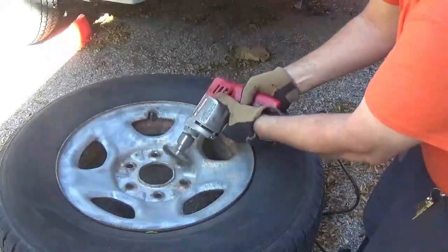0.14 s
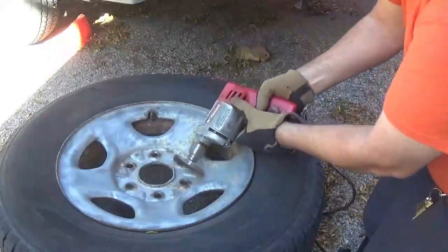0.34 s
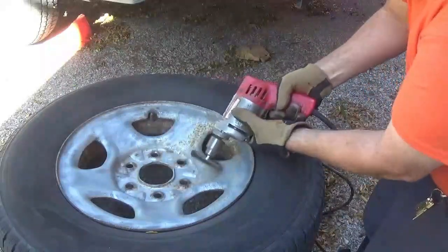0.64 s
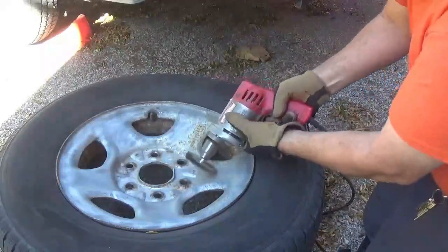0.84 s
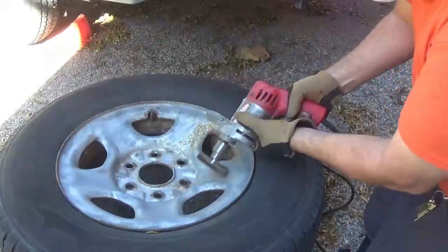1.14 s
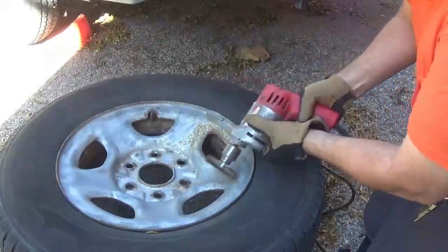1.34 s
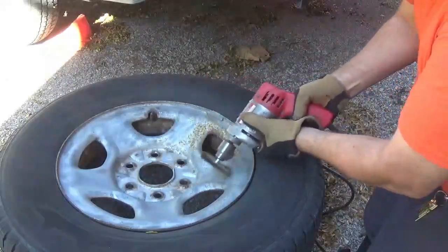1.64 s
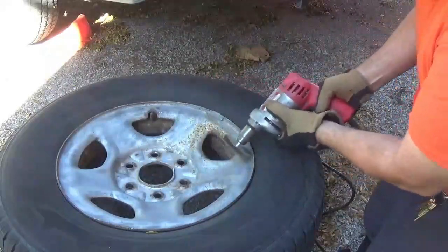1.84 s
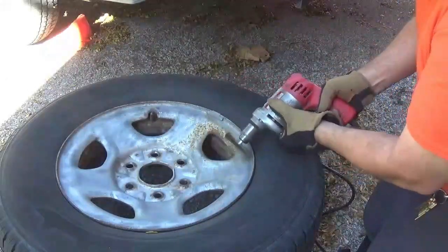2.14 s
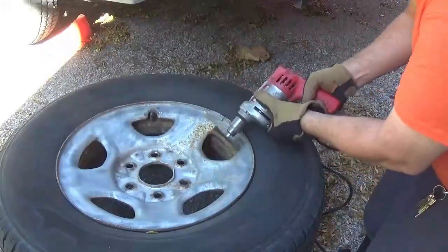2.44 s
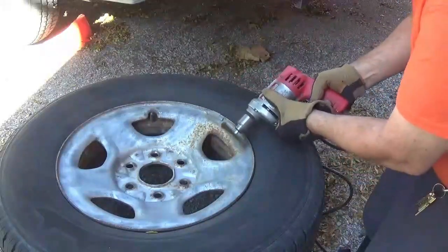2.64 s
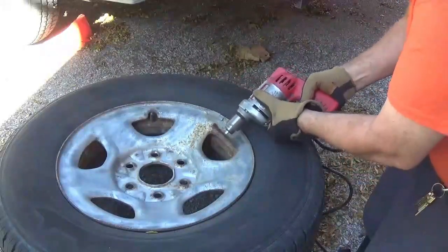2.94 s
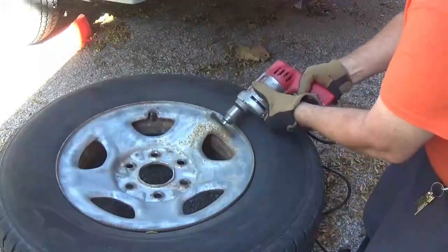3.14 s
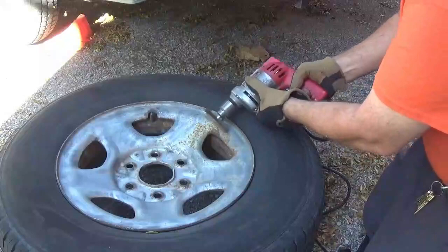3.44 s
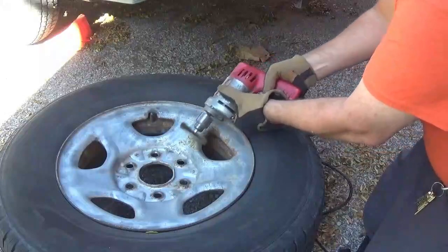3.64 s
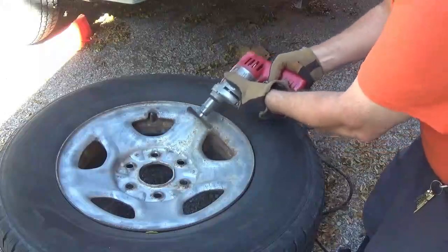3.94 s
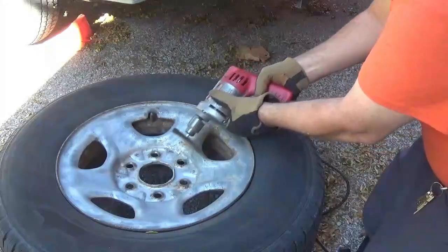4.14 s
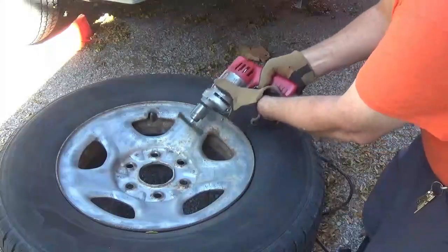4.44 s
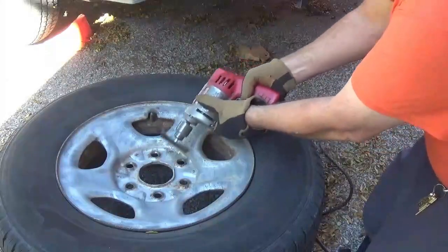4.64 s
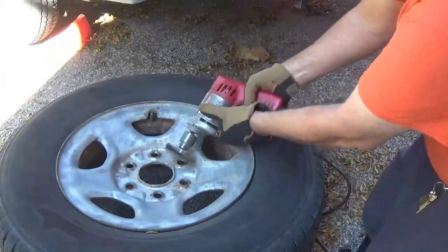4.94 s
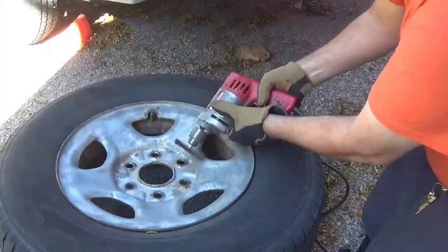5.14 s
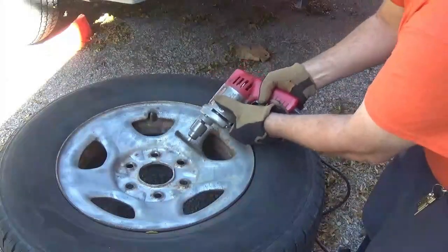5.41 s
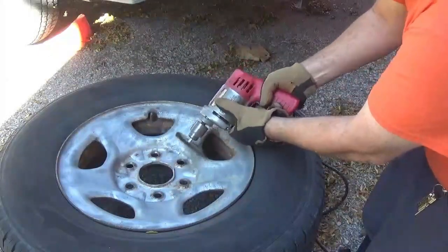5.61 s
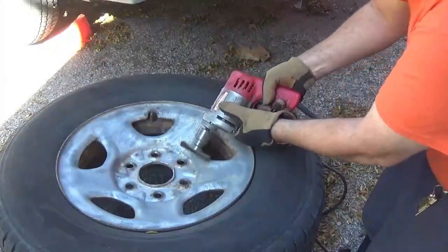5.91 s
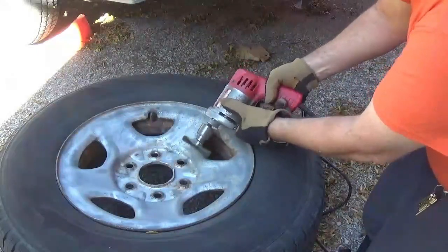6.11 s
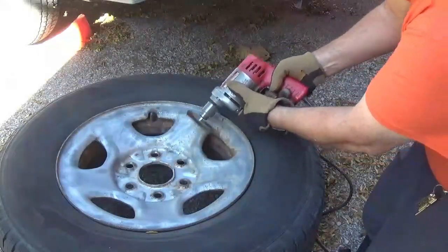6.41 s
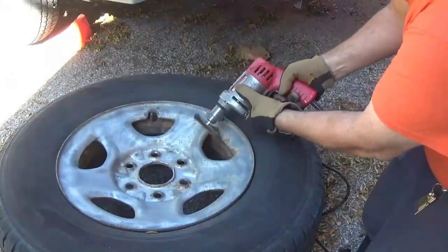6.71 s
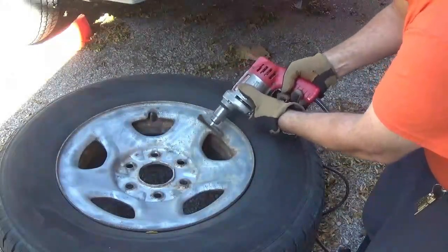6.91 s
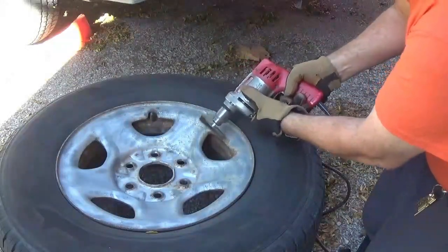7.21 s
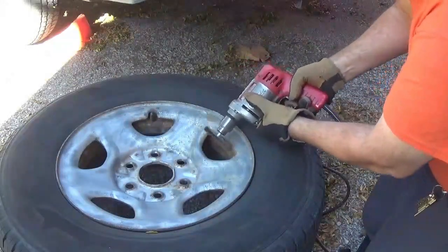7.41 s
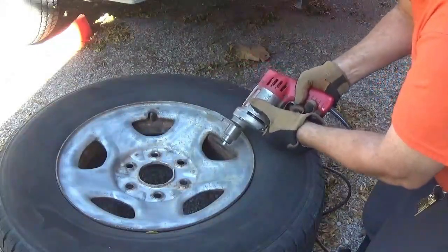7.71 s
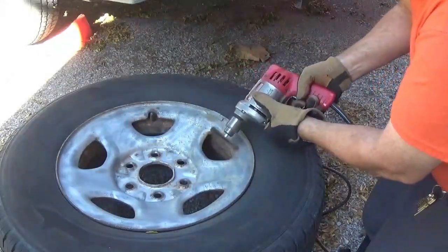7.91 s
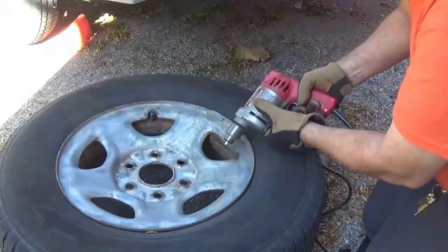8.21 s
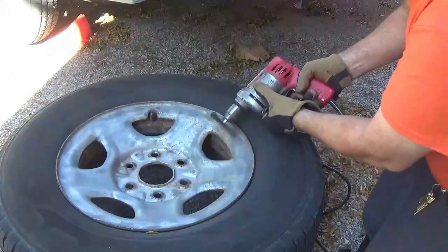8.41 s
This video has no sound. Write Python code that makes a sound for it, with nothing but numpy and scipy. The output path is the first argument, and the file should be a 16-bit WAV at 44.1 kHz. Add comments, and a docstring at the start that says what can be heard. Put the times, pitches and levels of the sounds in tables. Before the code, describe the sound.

The drill is already running at 0 seconds, close and in narrow stereo outdoors, and never stops. A high whine near 3.9 kHz starts fairly weak, strengthens by 0.7 and rises to about 4.1 kHz around 1.4. Wire tips make a dense scratchy hiss with a bright sizzle, surging with pushes near 0.4, 1.6 and 2.7. From about 3.6 to 4.6 the brush bears hard on the wheel face: scraping thickens, metal rings in short catches, and the whine sags to roughly 3.9 kHz. Gear hiss brightens around 5. The pitch then climbs to about 4.2 kHz by 6.3, strong and piercing, while another sliding push swishes at 6.6. It slowly sinks toward 4 kHz as edge scraping and a swell of wheel ringing continue to the cut at about 8.5. Vent air is steady; soft low wind swells late.

```python
"""Wire scratches and a gear head hisses under a whine: a corded drill spins a wire brush over a steel
truck wheel lying on a driveway, heard by a close pair of microphones.
Strikes of the wire tips are coloured noise and set the wheel's modes ringing; the gears are throbbing noise.
The cooling fan's whine is a tone that sags in pitch under load, with weaker tones from the motor shaft.
Vent air, a little wind and a low hum lie underneath."""
import sys
import numpy as np
from scipy import signal
from scipy.fft import rfft, irfft, next_fast_len
from scipy.io import wavfile
from scipy.ndimage import map_coordinates

SR = 44100
rng = np.random.default_rng(int(sys.argv[2]) if len(sys.argv) > 2 else 0)


def persist_wave(psi):
    """Save psi, clipped to +-1, as 16-bit WAV."""
    counts = np.round(np.clip(psi, -1, 1) * 32767).astype(np.int16)
    wavfile.write(sys.argv[1], SR, np.atleast_2d(counts).T)


N = 377496

BLADES = 12  # on the cooling fan

# The fan's blade tone, which gives the motor speed. Each row: time in seconds, pitch in Hz.
FAN_PITCH = [(0.0, 3900), (0.14, 3834), (0.32, 3887), (0.46, 3856), (0.68, 4011), (1.04, 4118),
             (1.44, 4134), (1.6, 4078), (1.86, 4080), (1.94, 4030), (2.26, 4084), (3.22, 4035),
             (3.64, 4036), (3.84, 3935), (4.16, 3923), (4.26, 3870), (4.77, 3995), (4.84, 3927),
             (4.99, 3937), (5.16, 3895), (5.26, 3920), (5.46, 4110), (5.84, 4211), (6.32, 4238),
             (6.52, 4193), (6.8, 4225), (7.08, 4158), (7.66, 4105), (7.88, 4063), (8.14, 4047),
             (8.42, 4005), (8.56, 4044)]


def gain_of(db):
    """Decibels to amplitude."""
    return 10 ** (np.asarray(db) / 20)


def evened(x):
    """Scales to rms 1."""
    return x / np.sqrt(np.mean(abs(x) ** 2) + 1e-20)


def curves(rows):
    """Each column of a timed table, sample by sample."""
    s, *columns = np.transpose(rows)
    return [np.interp(np.arange(N) / SR, s, column) for column in columns]


def swells(rows):
    """Each column of an event table as smooth humps that rise and fall."""
    t = np.arange(N) / SR
    total = 0
    for middle, length, *heights in rows:
        phase = np.pi * np.clip((t - middle) / length, -.5, .5)
        total = total + np.outer(heights, np.cos(phase) ** 2)
    return total


def read(points, hz):
    """A table against frequency, read on a log-frequency axis."""
    f, value = np.transpose(points)
    return np.interp(np.log(hz + 1), np.log(f + 1), value)


def wander(rate_hz):
    """Slow chance of rms 1, mostly below the given rate."""
    points = 8192
    hz = np.fft.rfftfreq(points, N / points / SR)
    spectrum = rfft(rng.standard_normal(points)) / np.sqrt(1 + (hz / rate_hz) ** 4)
    return evened(np.interp(np.arange(N) * points / N, np.arange(points), irfft(spectrum)))


def noise():
    """Two unrelated white noises."""
    return rng.standard_normal((2, N))


def strikes(per_s, spread_db):
    """Dense tiny impacts of uneven size, at chance moments on each side."""
    size = gain_of(spread_db * np.minimum(rng.exponential(1, N), 4))
    return evened(noise() * size * (rng.random(N) < per_s / SR))


def ports(pair, colour):
    """Colours two unrelated signals and blends them into a close pair of microphones."""
    # Each row: frequency in Hz, likeness of left and right (0 to 1).
    likeness = [(60, 0.89), (250, 0.89), (600, 0.91), (1200, .91), (2400, .9), (5000, 0.96), (9000, 0.9)]
    size = next_fast_len(N, True)
    hz = np.fft.rfftfreq(size, 1 / SR)
    same = np.clip(read(likeness, hz), 0, .999)
    mid, side = rfft(pair, size) * colour(hz) * np.sqrt([1 + same, 1 - same])
    return evened(irfft([mid + side, mid - side], size)[:, :N])


def shaped(pair, spectrum):
    """A stereo sound of rms 1 with the given spectrum."""
    return ports(pair, lambda hz: gain_of(read(spectrum, hz)))


def warped(pair, at):
    """A stereo sound read at the given sample positions."""
    return np.array([map_coordinates(side, [at], order=3, mode="mirror") for side in pair])


def tone(turns, waver=0.38, smear=0.25):
    """A line of rms 1 that wavers a little in level and phase."""
    level = 1 + waver * wander(9.6)
    return evened(level * np.cos(2 * np.pi * (turns + rng.random()) + smear * wander(7.4)))


def face_share():
    """Where the brush bears: 0 at the edge of a window, 1 on the face of the disc."""
    # Each row: time in seconds, share on the face.
    place = [(0, .95), (.45, 0.56), (.8, 0.42), (2.2, 0.41), (2.6, .05), (3.5, 0.15), (3.72, 1),
             (4.35, 0.96), (4.6, 0.92), (5.5, 0.74), (6.4, .55), (7, .2), (8.56, 0.095)]
    return np.clip(curves(place)[0], 0, 1)


def worked(law):
    """A level in dB that follows the load, which slows the motor, and the place of contact."""
    free_hz, loaded_hz = 4240, 3840  # blade tone running free and at full load
    free_db, load_db, face_db = law
    load = (free_hz - curves(FAN_PITCH)[0]) / (free_hz - loaded_hz)
    return free_db + load_db * load + face_db * face_share()


def brush(turns, gearing=17.0, wobble=0.015):
    """Wire tips strike, ring and slide; the slightly lopsided brush bears harder once a turn."""
    # Pushes, in which the wires dig in and slide.
    # Each row: middle in seconds, length in seconds, dig in dB, slide in dB.
    pushes = [(0, 0.59, 1, 4.5), (.42, 0.53, -0.5, 5.5), (.85, .4, -1, 0), (1.62, 1.0, 0, 6.5),
              (2.12, .45, 0, 5.5), (2.7, .6, 1, 4.5), (3.7, 1.0, 3.5, 4), (4.13, 0.49, 5.5, 5),
              (4.62, .4, 3, 5.5), (5.48, .45, 3, 3), (5.97, 0.2, 2.5, 1), (6.6, 0.54, 3.5, 7),
              (7.1, 0.38, 0.5, 4), (8.05, 0.21, 2, 3), (8.38, 0.19, 2, 3)]
    # How hard the hands lean between pushes. Each row: time in seconds, level in dB before the scrape trim.
    lean = [(0, -33), (.45, -35.5), (.7, -29), (3.1, -30.5), (5.1, -31.5), (7.1, -28), (8.56, -30.5)]
    # Rise and fall of the tips' sizzle; only the departure from its mean counts.
    # Each row: time in seconds, relative level in dB.
    sizzle_level = [(0.0, -24.5), (0.44, -23.5), (0.68, -27.5), (0.84, -25), (1.04, -27), (2.18, -24.5),
                    (2.84, -24.5), (3.96, -29.4), (4.06, -27.5), (4.62, -28.5), (5.08, -25), (5.28, -28.9),
                    (5.98, -28.5), (6.3, -29.5), (8.4, -24.5), (8.56, -26)]
    # Each holds: dB running free at an edge, dB added at full load, dB added on the face.
    rasp_law, swish_law = (-36, 7.1, -7), (-33.5, .5, 3.5)
    # Spectra. Each row: frequency in Hz, relative dB per Hz (the sizzle's before the tips bend).
    scrape_spectrum, rasp_spectrum = [(200, -38), (500, -15.5), (900, -8), (1400, -11), (1900, -17),
                                      (2500, -4.5), (3100, 1.5), (3800, 0.5), (4600, -3), (6000, -10),
                                      (8000, -7.5), (11000, -10.5)], [(250, -29.5), (550, -5), (900, -12.5), (1500, -3),
                                                      (1850, -6.5), (2100, 1.5), (2420, 2), (2800, 2),
                                                      (3600, -21), (6000, -23)]
    sizzle_spectrum, swish_spectrum = [(2500, -29), (4300, -12), (4900, -4.5), (5350, 0), (5750, -1.5),
                                       (6400, -7.5), (8000, -17), (11000, -28)], [(3000, -24.5), (5600, -9), (6300, 6.5), (6850, 6.5),
                                                       (7500, 3.5), (7900, -14), (9500, 4), (11000, -13)]
    scrape_trim_db, sizzle_mean_db = 3.5, -25
    sizzle_swing = 1.32  # the tips swing wider than the hiss around them
    rasp_per_dig, rasp_per_sizzle = 0.79, 0.55  # dB of rasp for each dB
    # sliding bends the tips, so they ring higher
    spectrum_hz, wire_rest_hz, wire_hz_per_db = 5350, 5170, 45

    dig_db, slide_db = swells(pushes)
    tips_db = curves(sizzle_level)[0]
    bite_db = tips_db - tips_db.mean()

    scrape_db = scrape_trim_db + curves(lean)[0] + dig_db
    scrape = gain_of(scrape_db) * shaped(strikes(per_s=18000, spread_db=1.5), scrape_spectrum)

    rasp_db = worked(rasp_law) + rasp_per_dig * dig_db + rasp_per_sizzle * bite_db
    rasp = gain_of(rasp_db) * shaped(strikes(per_s=7000, spread_db=2.5), rasp_spectrum)

    # reading the tips faster raises their pitch
    tips = shaped(strikes(per_s=20000, spread_db=1.9), sizzle_spectrum)
    wire_hz = wire_rest_hz + wire_hz_per_db * slide_db
    sizzle_db = sizzle_mean_db + sizzle_swing * bite_db + .5 * wander(9.1)
    sizzle = gain_of(sizzle_db) * warped(tips, np.cumsum(wire_hz / spectrum_hz))

    swish_db = worked(swish_law) + slide_db
    swish = gain_of(swish_db) * shaped(strikes(per_s=22000, spread_db=2.5), swish_spectrum)

    lopsided = 1 + wobble * np.cos(2 * np.pi * turns / gearing)
    bearing = lopsided * gain_of(.5 * wander(40))
    return bearing * (scrape + rasp + sizzle + swish)


def gear_head(turns, throb=0.26, chatter_db=0.7, drift_db=.5):
    """Teeth rattle once a shaft turn and ring the metal housing."""
    # Hiss of the gears. Each row: time in seconds, level in dB before the trim.
    gear_level = [(0.0, -25), (0.5, -25), (1.55, -28.9), (2.8, -28), (3.6, -28), (4.6, -26.5),
                  (4.85, -24.5), (5.35, -25), (5.7, -27), (7.3, -27.5), (8.56, -27)]
    # Housing spectrum. Each row: frequency in Hz, relative dB per Hz.
    housing = [(5000, -35), (7900, -8.5), (8350, -3), (8780, 2), (9150, -2.5), (9700, -9), (10400, -9.5),
               (11000, -15.5)]
    trim_db = 3
    unevenness = gain_of(chatter_db * wander(160) + drift_db * wander(3.7))
    mesh = (1 + throb * np.cos(2 * np.pi * turns)) * unevenness
    return gain_of(curves(gear_level)[0] + trim_db) * shaped(noise() * mesh, housing)


def reflections(pair, strength=0.15, drift=0.118):
    """Short echoes off the wheel and the pavement; they comb the hiss differently as the tool moves."""
    paths_s = (.0006, .0013, .0027, .0052)
    samples = np.arange(N)
    echoes = 0
    for path in paths_s:
        # longer paths drift by a smaller share of their length
        sway = drift * (0.0006 / path) ** 0.53 * wander(1.24)
        echoes = echoes + warped(pair, samples - SR * path * (1 + sway))
    return (pair + strength * echoes) / np.sqrt(1 + len(paths_s) * strength ** 2)


def wheel(judder_db=1.5):
    """The wires ring the wheel; the place of contact chooses which modes answer."""
    # Modes of the wheel. Each row: frequency in Hz, width in Hz,
    # relative dB when brushed on the face, relative dB when brushed at an edge.
    modes = [(650, 22, -10.5, -19), (905, 45, -19, -3), (1013, 56, 4.5, -12), (1133, 95, 0, -4),
             (1188, 31, 2.5, -0.5), (1275, 47, 1, -0.5), (1363, 34, -32, -0.5), (1480, 61, -22, -3.5),
             (1690, 58, -3, -18), (1823, 26, 0, -10), (1948, 46, -8, -6.5), (2154, 35, -9, -23),
             (2434, 34, -32, -2.5)]
    # The brush catches and sets the wheel ringing. Each row: middle in seconds, length in seconds, rise in dB.
    catches = [(.09, 0.13, 7.5), (.7, .4, 3), (1.65, 0.11, 0.5), (3.42, 0.18, 0.5), (3.78, 0.21, 7.5),
               (3.97, .12, 3.5), (4.24, 0.18, 4.5), (7.88, 1, 3)]
    # Holds: dB running free at an edge, dB added at full load, dB added on the face.
    ring_law = (-36, 3.9, -1.2)
    mode_hz, width_hz, face_db, edge_db = np.transpose(modes)
    share = face_share()

    def ring(levels_db):
        """Modes under a hail of wire tips; their skirts fall away steeply."""
        def colour(hz):
            """Powers of all modes, summed, as amplitude."""
            power = 0
            for f, width, db in zip(mode_hz, width_hz, levels_db):
                offset = (hz - f) / (0.76 * width)
                power = power + gain_of(db) ** 2 / (1 + offset ** 2) ** 2
            return np.sqrt(power)

        return ports(strikes(per_s=9000, spread_db=1.3), colour)

    drive = gain_of(worked(ring_law) + swells(catches)[0] + judder_db * wander(7.5))
    return drive * (np.sqrt(share) * ring(face_db) + np.sqrt(1 - share) * ring(edge_db))


def fan(turns, rush_db=-37, swirl=0.08, sway=0.064, trim_db=0.27, flutter_db=-39):
    """The blade tone with its sidebands, in a narrow rush of turbulent air."""
    # The blade tone as the drill is turned about.
    # Each row: time in seconds, level in dB before the trim, left over right in dB.
    whine_level = [(0.0, -27.5, 0.8), (0.42, -26.5, 0.2), (0.66, -19, 0.5), (1.58, -16.8, -0.8),
                   (1.66, -20.5, -0.2), (1.86, -18, -1), (2.0, -22, -2.5), (2.48, -18, -0.5),
                   (3.92, -17, -0.5), (4.08, -22.5, 1.6), (4.32, -18.5, 0.0), (5.44, -19, 0.3),
                   (5.76, -14.5, 0.0), (5.9, -16.5, -1), (6.38, -15, 0.6), (6.6, -22.1, 1),
                   (6.74, -17, -0.5), (7.66, -17.0, -0.5), (8.04, -21, -1.4), (8.56, -19, -0.6)]
    # Sidebands from slightly unequal blades.
    # Each row: multiple of the shaft speed, dB against the blade tone with the brush at an edge.
    uneven = [(11, -32), (13, -21.5), (14, -31)]
    sideband_face_db = -2  # they sink while the brush is on the face
    level_db, pan_db = curves(whine_level)
    blade = np.exp(2j * np.pi * BLADES * turns)
    # each microphone hears the tone by slightly different paths
    paths = 1 + sway * wander(21) + swirl * 1j * wander(4.06) * np.array([[1], [-1]])
    sidebands = sum(gain_of(db) * tone(k * turns) for k, db in uneven)
    sidebands = gain_of(sideband_face_db * face_share()) * sidebands
    side_db = level_db + trim_db + pan_db * np.array([[.5], [-.5]])
    whine = (evened((blade * paths).real) + sidebands) * gain_of(side_db)
    # the rush and a shifting echo stay when the tone fades, so a weak whine is rough and flutters
    rush = evened((blade * (wander(130) + 1j * wander(130))).real)
    echo = evened((blade * (wander(5.9) + 1j * wander(9))).real)
    return whine + gain_of(rush_db) * rush + gain_of(flutter_db) * echo


def motor(turns, waver=0.23, smear=0.2):
    """Tones at whole multiples of the shaft speed; the fourth buzzes when the brush works an edge."""
    # The weaker tones. Each row: multiple of the shaft speed, level in dB.
    shaft_tones = [(1, -56.5), (2, -50.5), (3, -53), (5, -53), (6, -51), (7, -50), (8, -51), (10, -49),
                   (21, -47), (24, -39), (28, -47), (30, -51)]
    # Holds: dB running free at an edge, dB added at full load, dB added on the face.
    buzz_law = (-45.5, 11.4, -11.5)
    buzz = gain_of(worked(buzz_law)) * tone(4 * turns)
    return buzz + sum(gain_of(db) * tone(k * turns, waver, smear) for k, db in shaft_tones)


def low_glide(turns, level_db=-55.5):
    """A faint low tone glides at the distance between the whine and a fixed pitch; its lowest part is thinned."""
    fixed_hz = 3900
    glide = tone(BLADES * turns - fixed_hz * np.arange(N) / SR)
    highpass = signal.butter(1, 220, "high", fs=SR, output="sos")
    return gain_of(level_db) * signal.sosfilt(highpass, glide)


def vent_air():
    """Steady air from the motor vents, as coloured noise."""
    # Each row: frequency in Hz, relative dB per Hz.
    air_spectrum = [(15, -38), (35, -24), (65, -27), (130, -15), (280, -16), (450, -14), (750, -9),
                    (1100, -3), (1500, -15.5), (1950, -32), (3200, -2), (4300, 6), (6000, -15.5),
                    (11000, -17)]
    return gain_of(-29.0) * shaped(noise(), air_spectrum)


def wind():
    """Lumpy low noise of wind at the microphones, its level also tied to the load and place of contact."""
    # Each row: frequency in Hz, relative dB per Hz.
    wind_spectrum = [(12, -27), (45, -12), (80, 2.5), (150, -1.5), (230, -1.5), (400, -19), (1000, -40)]
    # Gusts. Each row: middle in seconds, length in seconds, rise in dB.
    gusts = [(2.12, 0.54, 9), (4.12, 0.44, 7), (6.95, 1, 13), (7.64, 0.39, 11), (8.45, 0.77, 10)]
    # Holds: dB running free at an edge, dB added at full load, dB added on the face.
    wind_law = (-59, 9.2, -5)
    level_db = worked(wind_law) + swells(gusts)[0] + 2.0 * wander(8)
    return gain_of(level_db) * shaped(noise(), wind_spectrum)


def low_hum():
    """Low sines that waver in phase, each fading out before its end time."""
    # Each row: frequency in Hz, level in dB, time it has died away in seconds.
    hums = [(59, -59.5, 12), (134, -59, 4.66), (223, -61, 5.8)]
    fade_s = .8
    t = np.arange(N) / SR
    total = 0
    for hz, db, end in hums:
        fade = np.clip((end - t) / fade_s, 0, 1)
        sine = evened(np.sin(2 * np.pi * hz * t + 0.43 * wander(2.3)))
        total = total + gain_of(db) * fade * sine
    return total


def scene():
    """One motor speed drives the fan, the gears and the brush."""
    shaft_hz = curves(FAN_PITCH)[0] / BLADES * (1 + 0.00055 * wander(26))
    turns = np.cumsum(shaft_hz) / SR
    hiss = reflections(brush(turns) + gear_head(turns))
    machine = fan(turns) + motor(turns) + low_glide(turns)
    return hiss + wheel() + machine + vent_air() + wind() + low_hum()


def record(dry):
    """The recorder's band limit, a steep lowpass."""
    lowpass = signal.firwin(601, 11050, window=("kaiser", 9), fs=SR)  # cutoff in Hz
    return signal.oaconvolve(dry, lowpass[None], "same")


dry = scene()
out = record(dry)
persist_wave(out)
```